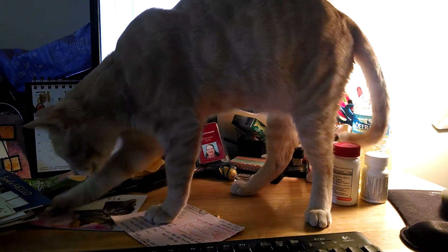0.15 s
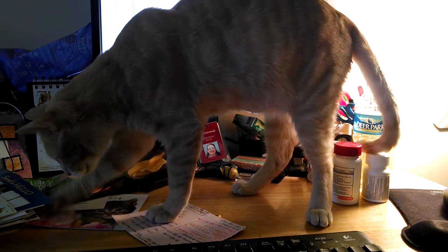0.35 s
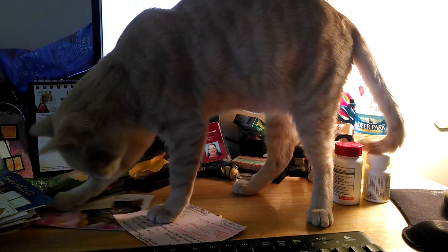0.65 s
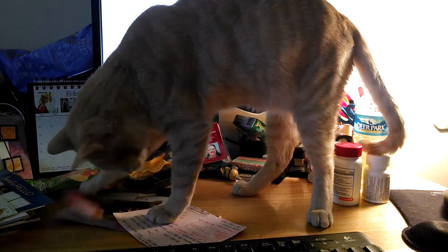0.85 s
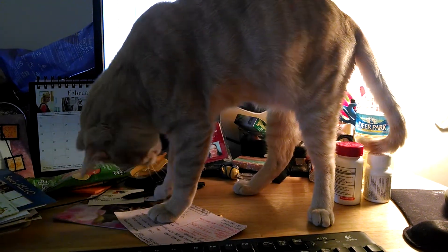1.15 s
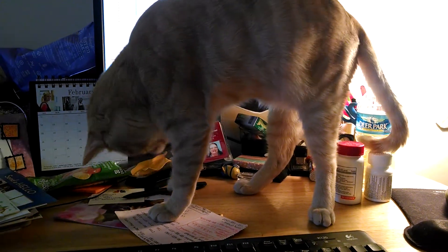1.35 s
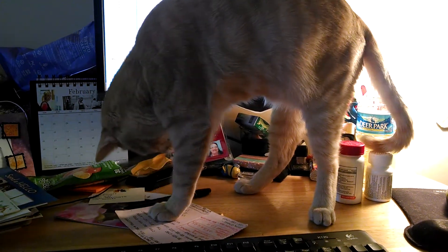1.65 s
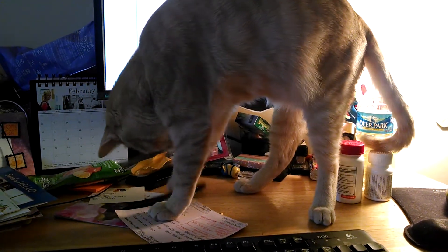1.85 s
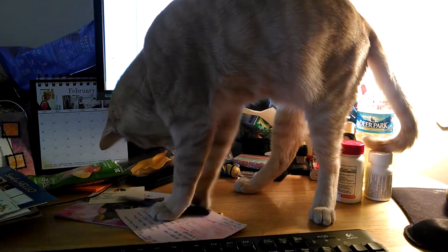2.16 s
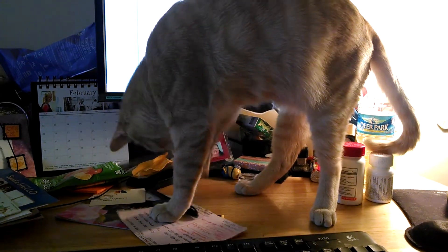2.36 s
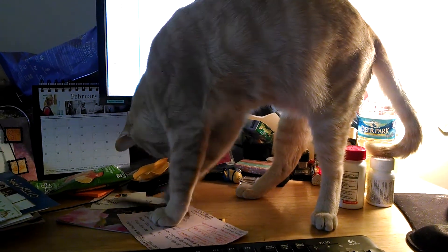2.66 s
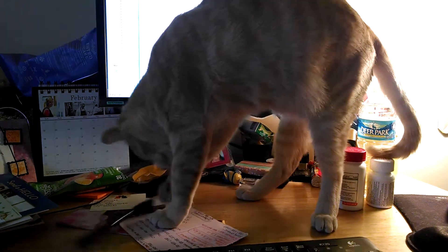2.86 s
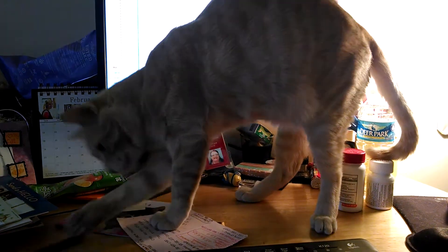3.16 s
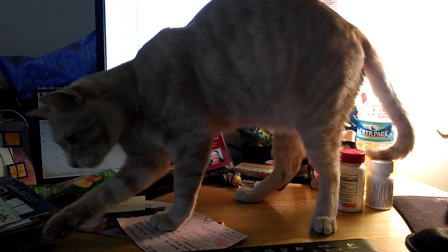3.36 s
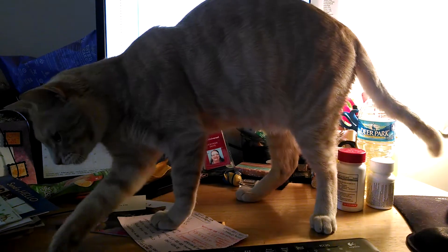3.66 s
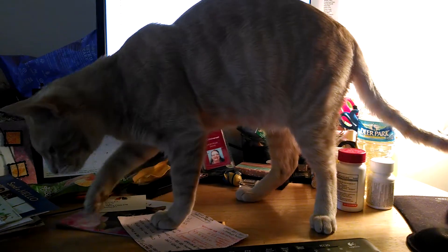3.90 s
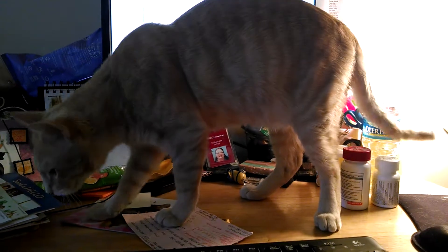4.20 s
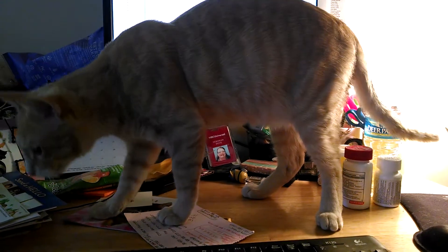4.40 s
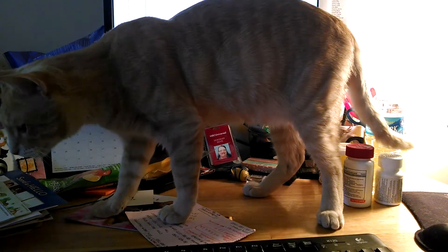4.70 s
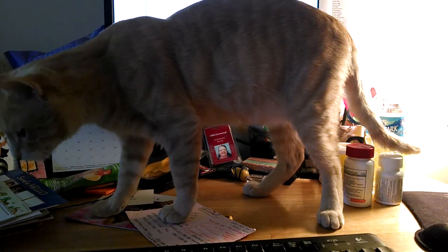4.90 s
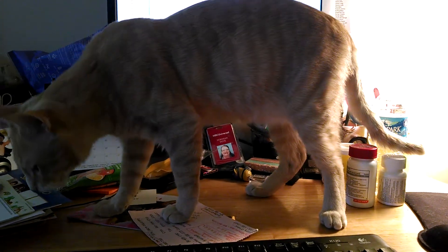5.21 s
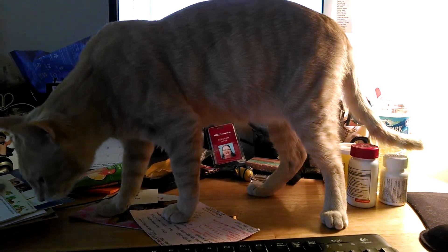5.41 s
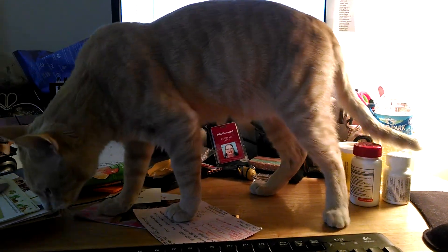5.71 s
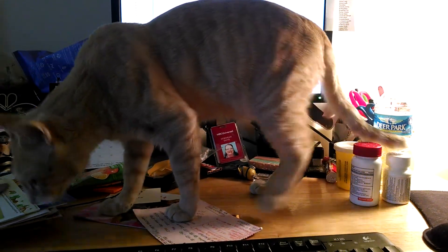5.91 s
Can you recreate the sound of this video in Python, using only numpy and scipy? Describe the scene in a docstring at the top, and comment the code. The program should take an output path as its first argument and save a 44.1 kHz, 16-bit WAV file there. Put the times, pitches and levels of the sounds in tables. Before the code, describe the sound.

A cat paws loose papers on a wooden desk, with irregular crackling snaps, short slides and knocks over a faint fan hum.

```python
"""Cat pawing papers on a desk

Loose sheets snap, slide and knock a wooden desk: decaying noise bursts, slightly uneven coloured noise,
desk resonances. Soft paw falls are damped sines; a short noise tail gives the papers a room.
A computer fan (noise and unsteady tones) and a deep rumble lie behind.
A small stereo camera turns its gain down after loud snaps and widens the stereo picture.
"""
import sys
import numpy as np
from scipy import signal
from scipy.fft import rfft, irfft, next_fast_len
from scipy.io import wavfile
from scipy.ndimage import uniform_filter1d, map_coordinates

SR = 44100
rng = np.random.default_rng(int(sys.argv[2]) if len(sys.argv) > 2 else 0)


def wrap_up_sound(samples):
    """Save the sound to the file named by the first command line argument, as 16-bit audio."""
    columns = np.atleast_2d(samples).T
    # keep every value between -1 and 1, then stretch to whole-number steps
    tamed = np.clip(columns, -1, 1)
    steps = np.round(tamed * 32767).astype(np.int16)
    wavfile.write(sys.argv[1], SR, steps)


N = 266787

# Paper snaps. Each row: start in seconds, sheet level in dB before layer gains, sheet note in Hz,
# then desk knock, crack and crispness in dB relative to the sheet, body t60 in seconds.
SNAPS = [(0.5678, -43, 1100, -27, -9, -10, 0.032), (0.5743, -49, 1490, -15, 3, 5, 0.02),
         (0.6994, -32.5, 1470, -2, -4, -18, 0.06), (0.7145, -37.5, 1460, -2, -14, -13, 0.023),
         (0.9096, -31.5, 1760, -15, -11.5, -24, 0.035), (0.9211, -36, 1270, -25, -5, -10, 0.015),
         (0.982, -16.5, 897, -10.5, -19, -20.5, 0.032), (1.033, -25, 940, -7, -11.5, -5, 0.017),
         (1.0771, -24, 1915, -7, -7, -8, 0.038), (1.1082, -33, 1510, -12, -22, -14.5, 0.043),
         (1.4253, -50, 1330, -5, 5.5, -2, 0.014), (1.5828, -35.5, 1610, -9.5, -7.5, -5.5, 0.05),
         (1.591, -27.5, 1730, -32, -16, -24, 0.014), (1.618, -49, 1100, -18, 7.5, 0, 0.027),
         (1.748, -38, 1660, -24, -24, -27, 0.021), (1.769, -38.5, 1430, -30, -3.5, -15, 0.05),
         (2.0083, -27.5, 842, 0.5, -9.5, -33, 0.051), (2.0125, -16, 1650, 0, -9.5, -8, 0.013),
         (2.0214, -39.5, 1460, -12, -11, 10.5, 0.029), (2.0514, -27, 1740, -21, -13.5, -30, 0.026),
         (2.1242, -26, 1475, -5, -19, -1, 0.042), (2.2408, -32, 1480, -10, 2, 15, 0.016),
         (2.2685, -37.5, 1760, -9, -14, 11.5, 0.01), (2.3049, -35, 1800, -8, -8.5, -5, 0.012),
         (2.4007, -28, 1530, -7.5, -2.5, -13.5, 0.045), (2.4429, -12, 1840, -11.5, 9, -6.5, 0.005),
         (2.4503, -47.5, 1030, 11, -15, 22.5, 0.017), (2.4749, -35, 744, -2.5, -23, 5.5, 0.02),
         (2.6055, -55, 1020, -1, 0.5, 9.5, 0.018), (2.6514, -41.5, 1770, -6, -18, 9.5, 0.016),
         (2.698, -40.5, 1482, -14, -8, 6.5, 0.014), (2.9228, -40.5, 1060, -8.5, -3.5, 0, 0.02),
         (3.0003, -32.5, 1550, -17, -7, -16, 0.043), (3.046, -46.5, 1740, -15, 5, -8, 0.016),
         (3.0893, -22, 1125, -14.5, -6.5, -18, 0.045), (3.133, -30, 1570, -25, -9, -21, 0.045),
         (3.1537, -36, 1523, -5, 0, -3, 0.025), (3.1687, -11, 910, -9.5, -35, -12.5, 0.013),
         (3.177, -21.5, 1010, -11, -25, -17, 0.039), (3.2145, -32.5, 699, -12, -8, -3.5, 0.043),
         (3.244, -20, 990, -29, -3, -8, 0.033), (3.3407, -36.5, 1650, 0.5, -3, 4, 0.022),
         (3.3554, -41, 1680, -6, -3, -1, 0.0087), (3.712, -21, 1370, -13.5, -3, -7.5, 0.025),
         (3.7264, -33.5, 1150, -2.5, -28, -10, 0.036), (4.1882, -52.5, 1300, -7, 1.5, 4, 0.023),
         (5.934, -61, 756, -11, 4.5, -10, 0.025)]
# Sheets sliding under a paw. Each row: start in seconds, length in seconds, rub level in dB,
# change over the stroke in dB, scratch over rub in dB, fizz over rub in dB.
SLIDES = [(0.669, 0.043, -60.5, 10, -1, -2), (0.701, 0.14, -44.5, -0.5, -7.5, -2),
          (0.825, 0.041, -41, -4.5, -4.5, -4), (0.853, 0.062, -54.5, -5.5, 3, 5),
          (0.906, 0.02, -37.5, -1, -13, -11), (0.931, 0.064, -57.5, 11, -5, -5),
          (0.981, 0.062, -39, -13.5, -2.5, -4), (1.038, 0.18, -47.5, -13.5, -9.5, -10),
          (1.423, 0.072, -52.5, -23, -6, 0), (1.588, 0.13, -60, -12, 2, 3), (1.741, 0.037, -56, 1, -7, -16),
          (1.772, 0.08, -49.5, -4.5, -3, -3), (1.906, 0.027, -65, 3.5, -4, 7),
          (2.02, 0.15, -70, -2, 11.5, 8), (2.121, 0.065, -40.5, -25, -15, 1),
          (2.17, 0.073, -60, -11, -3, 3), (2.241, 0.039, -49, 3.5, -2, 9), (2.282, 0.11, -62, 0, 5.5, 6),
          (2.4, 0.22, -59, -9, 2, 1), (2.651, 0.04, -56, 6.5, -1, 12), (2.684, 0.041, -54, -5, 2, 2),
          (2.749, 0.066, -45.5, -2, -5.5, -4.5), (2.81, 0.04, -61, -4, 2, 5),
          (2.842, 0.037, -67, 1, 6, 13.5), (3.011, 0.075, -55, 4.5, -1.5, -3),
          (3.09, 0.067, -49.5, 2, -3, -7), (3.179, 0.032, -33, -19, -5, -20),
          (3.202, 0.041, -52, 17, -3, -22), (3.237, 0.18, -40, -17, -6.5, -14),
          (3.61, 0.042, -54.5, 15.5, -24.5, -20), (3.642, 0.08, -50, 3, -10, -16),
          (5.784, 0.05, -70, 0, -17, -12)]
# Soft paw falls felt through the desk. Each row: start in seconds, level in dB.
PAW_FALLS = [(1.032, -27.5), (1.264, -45), (2.015, -34), (2.127, -25), (2.242, -32), (2.449, -33),
             (5.792, -37)]
# Desk top resonances. Each row: centre in Hz, width in Hz, gain in dB.
DESK_MODES = [(280, 540, -14), (362, 124, 5), (625, 210, -2), (920, 115, -2.5)]
# Relative spectra of the whole sheet, crease, crisp edge and dragged sheet.
# Each row: frequency in Hz, level in dB per Hz.
SHEET_SPECTRUM = [(200, -16), (600, -26), (900, -9.5), (1150, -4.5), (1480, -4.5), (1900, -6), (2400, -6.5),
                  (3500, -12), (9000, -76)]
CREASE_SPECTRUM = [(500, -66.5), (1800, -15.5), (2800, 8), (3400, 3), (4100, 6), (5000, -2.5), (6500, -2),
                   (12000, -56)]
EDGE_SPECTRUM = [(1000, -65.5), (4000, -6.5), (6000, -1), (8500, 1.5), (10500, -3), (12500, -4),
                 (15000, -8.5), (17000, -36)]
RUB_SPECTRUM = [(200, -60), (600, -16.5), (950, -5.5), (1200, -2.5), (1480, -2), (1900, -7.5), (2400, -10),
                (3500, -18.5), (9000, -66.5)]
# Fan and room air, relative. Each row: frequency in Hz, centre in dB per Hz, difference in dB per Hz.
AIR_SPECTRUM = [(63, 1.5, 0), (138, -3.5, -2.5), (251, 3.5, -7), (338, -2.5, -7.5), (490, -5.5, -9),
                (660, -10, -15), (1120, -14, -14), (1740, -22, -16), (3150, -20, -21.5), (3800, -19, -25.5),
                (5340, -25, -21.5), (7400, -25, -25.5), (10800, -26, -25.5), (15000, -28.5, -28)]
# Slightly unsteady fan tones. Each row: frequency in Hz, mean sine amplitude in dB before panning.
FAN_TONES = [(120, -62), (361, -64), (524, -52.5), (673, -74), (1077, -76.5), (1573, -79.5)]
# The building's deep rumble. Each row: time in seconds, level in dB.
RUMBLE_LEVEL = [(0.0, -52.5), (0.17, -52.5), (0.39, -61.5), (2.75, -61), (3.349, -69.5), (3.89, -54),
                (5.401, -58), (6.05, -49.5)]
# Room decay. Each row: frequency in Hz, t60 in seconds.
ROOM_T60 = [(200, 0.57), (1500, 0.24), (4000, 0.18), (8000, 0.19), (15000, 0.17)]
# Stereo widener. Each row: frequency in Hz, share fed across (0 to 1).
CROSS_SHARE = [(60, 0.39), (500, 0.49), (1300, 0.82), (2700, 0.83), (4000, 0.24), (6000, 0.22),
               (15000, 0.3)]
# The ports differ. Each row: frequency in Hz, left minus right in dB.
PORT_LEAN = [(60, 1.5), (500, 1.5), (2000, -0.5), (6500, 0), (9000, -1.5), (15000, -3)]

EDGE_PAN_DB = -6.5  # left minus right: crisp edges lie to the right
STROKE_RAMP_S = 0.0091  # at each end of a stroke
SLOW_DB, MEDIUM_DB, FAST_DB = 0.3, 2.5, 2.5  # unevenness of the rub at three speeds
CROSS_DELAY_S = 0.0003739
FULL_SCALE, TOP_HZ = 0.95, 15600


def amp(db):
    """Decibels to amplitude factor."""
    return 10 ** (np.asarray(db) / 20)


def unit(x):
    """Scale to an rms of 1."""
    return x / np.sqrt(np.mean(x ** 2) + 1e-20)


def along(points, hz, axis=1):
    """Interpolate one column of (Hz, value, ..) points on a log frequency axis."""
    p = np.array(points)
    return np.interp(np.log(hz + 1), np.log(p[:, 0] + 1), p[:, axis])


def wobble(rate_hz):
    """Smooth random curve through rate_hz normal knots a second."""
    knots = rng.standard_normal(int(N * rate_hz / SR) + 4)
    return map_coordinates(knots, [np.arange(N) * rate_hz / SR])


def filtered(x, response):
    """Filter x by a complex response of frequency."""
    size = next_fast_len(x.shape[-1] + 8192)
    spectrum = rfft(x, size) * response(np.fft.rfftfreq(size, 1 / SR))
    return irfft(spectrum, size)[..., :x.shape[-1]]


def colour(spectrum):
    """Short causal (minimum-phase) filter of energy 1, by folding the cepstrum."""
    cepstrum = irfft(np.log(amp(along(spectrum, np.fft.rfftfreq(1024, 1 / SR)))))
    cepstrum[1:512] *= 2
    cepstrum[513:] = 0
    h = irfft(np.exp(rfft(cepstrum)))[:400]
    return h / np.linalg.norm(h)


def coloured(x, h):
    """Convolve both channels with h, cut to N samples."""
    return signal.fftconvolve(x, h[None], axes=1)[:, :N]


def pair(shape, alike):
    """Left and right noise with correlation alike."""
    a, b = rng.standard_normal((2, shape))
    turn = np.arccos(np.clip(alike, -1, 1)) / 2
    common, opposed = np.cos(turn) * a, np.sin(turn) * b
    return np.array([common + opposed, common - opposed])


def wood(hz):
    """Desk top response: resonances of alternating sign; it radiates no deep bass."""
    modes = 0
    for k, (centre_hz, width_hz, db) in enumerate(DESK_MODES):
        damping = 1j * hz * width_hz
        modes = modes + (-1) ** k * amp(db) * damping / (centre_hz ** 2 - hz ** 2 + damping)
    return modes * (1j * hz / (180 + 1j * hz)) ** 3


def snaps():
    """Each buckle is a dying burst: sheet body, crease, crisp edge to one side, bent-sheet note, desk knock."""
    body, crease, edge, notes = np.zeros((4, 2, N + SR))
    knock = np.zeros(N + SR)
    t = np.arange(SR // 8) / SR
    edge_pan_db = np.array([[EDGE_PAN_DB / 2], [-EDGE_PAN_DB / 2]])
    for start_s, db, note_hz, knock_db, crack_db, crisp_db, t60_s in SNAPS:
        t60_s = max(t60_s, .002)
        fade = amp(db - 60 * t / t60_s) * (1 - np.exp(-t / 0.00036))
        start = round(start_s * SR)
        at = slice(start, start + len(t))
        burst = pair(len(t), alike=0.32)
        burst *= fade / np.sqrt(np.sum((burst * fade) ** 2) / np.sum(fade ** 2) / 2)  # energy follows the blow
        sharp = burst * amp(2.5 - 35 * t / t60_s)  # treble is over sooner
        body[:, at] += burst
        crease[:, at] += sharp * amp(crack_db)
        edge[:, at] += sharp * amp(crisp_db + edge_pan_db)
        ring = np.sin(2 * np.pi * note_hz * t) * amp(-60 * t / 0.022)
        note = signal.fftconvolve(burst.mean(0), ring)[:len(t)]
        notes[:, at] += note * np.linalg.norm(fade) / np.linalg.norm(note)
        knock[at] += amp(knock_db) * np.abs(burst[0])  # one-sided push
    sheet = coloured(body, colour(SHEET_SPECTRUM) * amp(-5.5))
    sheet += coloured(crease, colour(CREASE_SPECTRUM) * amp(7.5))
    sheet += coloured(edge, colour(EDGE_SPECTRUM) * amp(3.5))
    return sheet + amp(-6) * notes[:, :N] + amp(17.5) * filtered(knock, wood)[:N]


def slides():
    """Dragged sheets hiss smoothly: coloured noise, slightly uneven at three speeds, swelling or fading in dB."""
    t, out, levels = np.arange(N) / SR, 0, np.zeros((3, N))
    for start_s, length_s, db, change_db, scratch_db, fizz_db in SLIDES:
        ramp = np.clip(np.minimum(t - start_s, start_s + length_s - t) / STROKE_RAMP_S, 0, 1)
        progress = np.clip((t - start_s) / length_s, 0, 1)
        levels += ramp * amp(db + change_db * progress) * amp([[0], [scratch_db], [fizz_db]])
    slow_db = SLOW_DB * wobble(70)  # shared by all layers
    spectra = (RUB_SPECTRUM, CREASE_SPECTRUM, EDGE_SPECTRUM)  # rub, scratch, fizz
    for level, spectrum, lean_db in zip(levels, spectra, (2, 4.9, -3)):
        uneven = amp(slow_db + MEDIUM_DB * wobble(120) + FAST_DB * wobble(600))
        noise = unit(coloured(uneven * pair(N, alike=0.11), colour(spectrum)))
        out = out + level * noise * amp([[lean_db], [-lean_db]])
    shake = unit(filtered(uneven * rng.standard_normal(N), wood))  # the drag also shakes the desk
    return out + amp(-4.5) * levels[0] * shake


def paws():
    """A padded paw gives one dull, quickly damped thump."""
    out, t = np.zeros(N + SR), np.arange(SR // 4) / SR
    thump = np.sin(2 * np.pi * 120 * t) * amp(-60 * t / 0.086) * (1 - np.exp(-t / 0.0057))
    for start_s, db in PAW_FALLS:
        out[round(start_s * SR):][:len(t)] += amp(db) * thump
    return out[:N]


def room(x):
    """Noise tail decaying at its own speed in each band, redrawn every 0.2 s of input."""
    out, size = np.zeros((2, N + 2 * SR)), SR // 5
    delay = 250  # samples
    for at in range(0, N, size):
        hz, t, z = signal.stft(rng.standard_normal((2, SR // 3)), SR, nperseg=256)
        z[1] *= (hz / (hz + 500))[:, None]  # long waves reach both close ports alike
        z *= amp(-.3 * hz / 1000)[:, None]  # soft furnishings swallow treble
        decay = amp(-60 * t / along(ROOM_T60, hz)[:, None])
        mid, side = signal.istft(z * decay, SR, nperseg=256)[1]
        tail = np.array([mid + side, mid - side]) / np.linalg.norm(mid)
        wet = signal.fftconvolve(x[:, at:at + size], tail, axes=1)
        out[:, at + delay:][:, :wet.shape[1]] += wet
    return out[:, :N]


def fan():
    """Air noise with slightly unsteady tones, stronger on the left."""
    def air_response(hz):
        return amp([along(AIR_SPECTRUM, hz), along(AIR_SPECTRUM, hz, axis=2)]) * (hz > 45)

    mid, side = filtered(rng.standard_normal((2, N)), air_response)
    air = amp(-52.5 + 1.14 * wobble(3.59)) * unit(np.array([mid + side, mid - side]))
    t, tones = np.arange(N) / SR, 0
    for hz, db in FAN_TONES:
        level = amp(db + 2.1 * wobble(5.5))
        phase_rad = 0.64 * wobble(11) + rng.uniform(0, 5.6)
        tones = tones + level * np.sin(2 * np.pi * hz * t + phase_rad)
    return air * amp([[.3], [-.3]]) + tones * amp([[.7], [-.7]])


def rumble():
    """Very low noise, much alike in both channels, with a slowly moving level."""
    time_s, db = np.transpose(RUMBLE_LEVEL)
    shape = [(8, -10), (22, -1.5), (38, 1.5), (60, -23), (120, -55)]  # Hz, dB
    low = filtered(pair(N, alike=0.79), lambda hz: amp(along(shape, hz)))
    return amp(np.interp(np.arange(N) / SR, time_s, db)) * unit(low)


def scene():
    """Paper with its room tail, paws, fan and rumble."""
    paper = snaps() + slides()
    return paper + amp(-11.0) * room(paper) + paws() + fan() + rumble()


def record(dry):
    """Gain control, widener subtracting each side's late copy from the other, full scale, band limit."""
    t = np.arange(N) / SR
    power = np.abs(uniform_filter1d(np.mean(dry ** 2, 0), size=220))
    loud_db = 10 * np.log10(power + 1e-12)
    over_db = 1.07 * np.maximum(loud_db + 21.0, 0)
    recovery_db = 6 * t  # 6 dB a second
    cut_db = np.maximum.accumulate(over_db + recovery_db) - recovery_db
    cut_db = uniform_filter1d(cut_db, size=3001, origin=1500)  # acts late, so the snap itself passes
    x = dry * amp(-cut_db)

    def cross(hz):
        return np.clip(along(CROSS_SHARE, hz), 0, 1) * np.exp(-2j * np.pi * hz * CROSS_DELAY_S)

    def ports(hz):
        return amp(along(PORT_LEAN, hz) * [[.5], [-.5]]) / (1 + (hz / TOP_HZ) ** 120)

    wide = x - filtered(x[::-1], cross)  # x[::-1] swaps left and right
    return filtered(np.clip(amp(-0.5) * wide, -FULL_SCALE, FULL_SCALE), ports)


dry = scene()
out = record(dry)
wrap_up_sound(out)
```